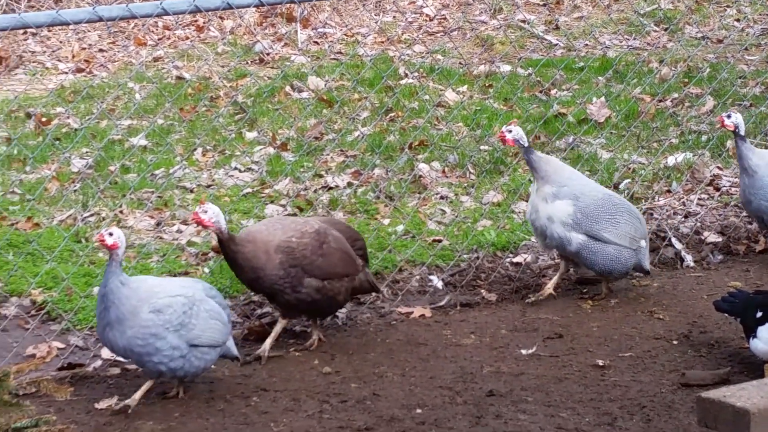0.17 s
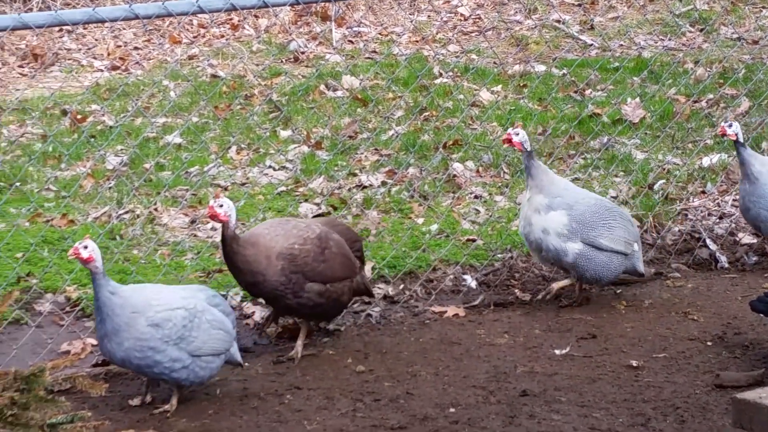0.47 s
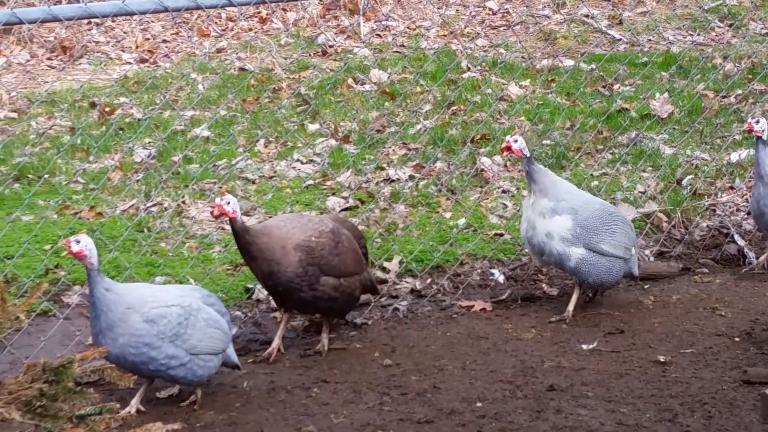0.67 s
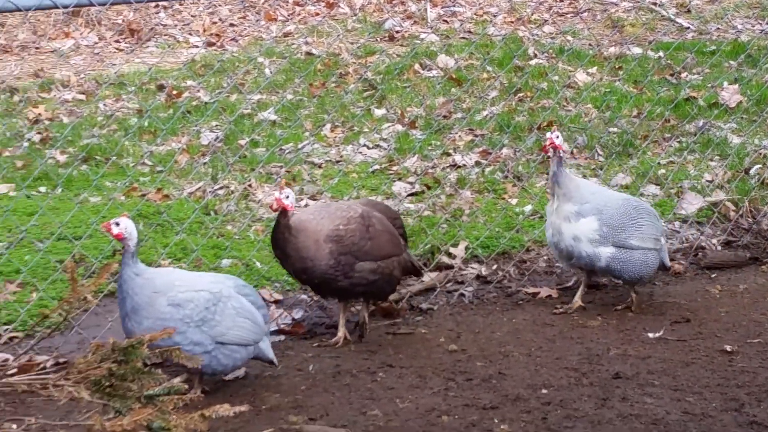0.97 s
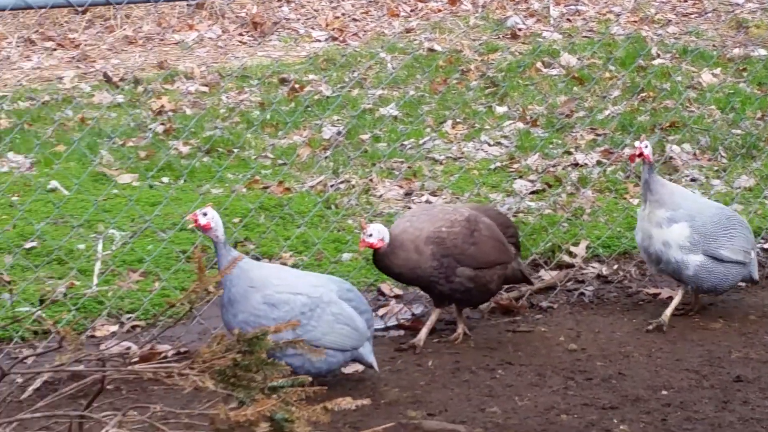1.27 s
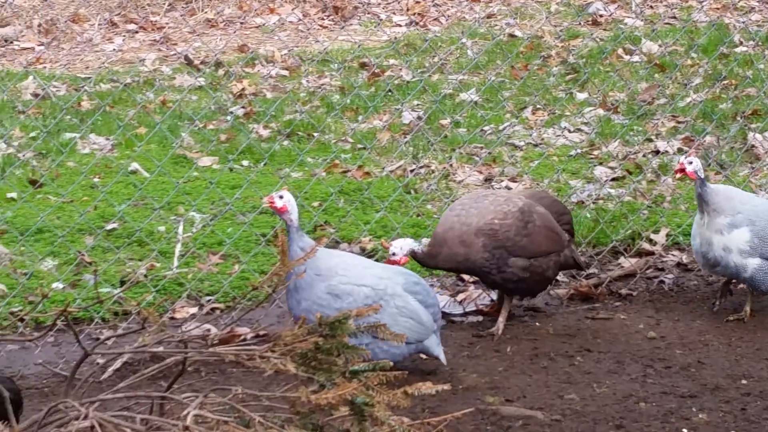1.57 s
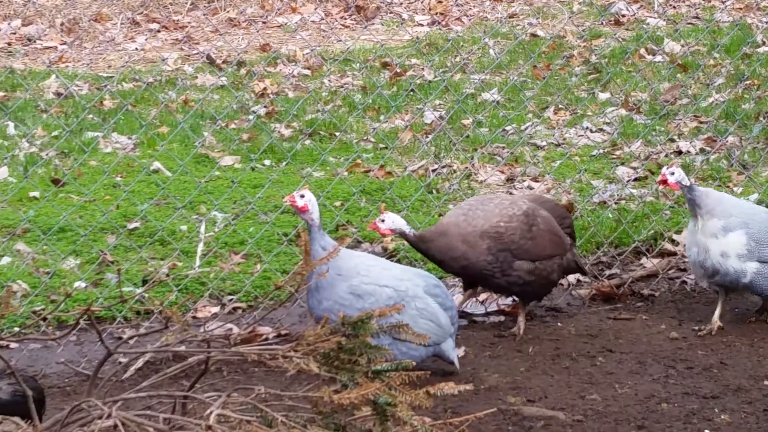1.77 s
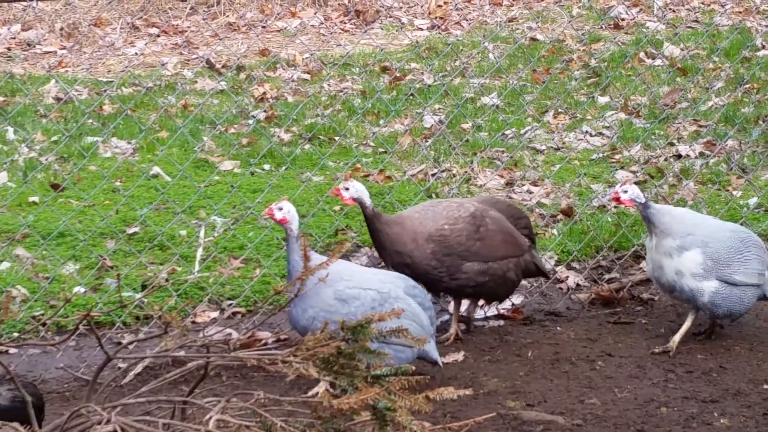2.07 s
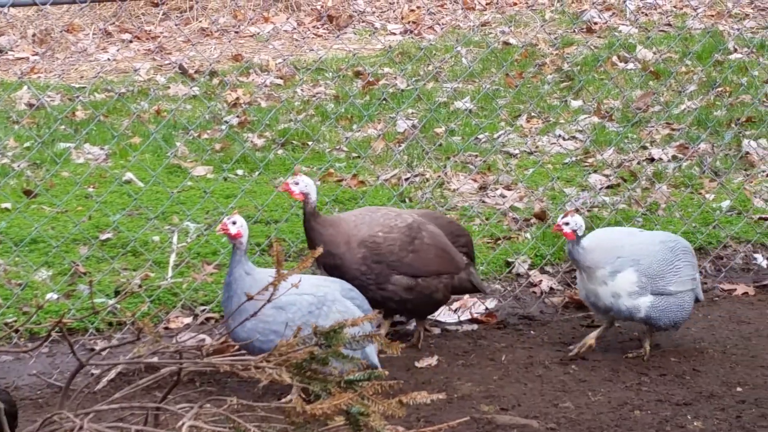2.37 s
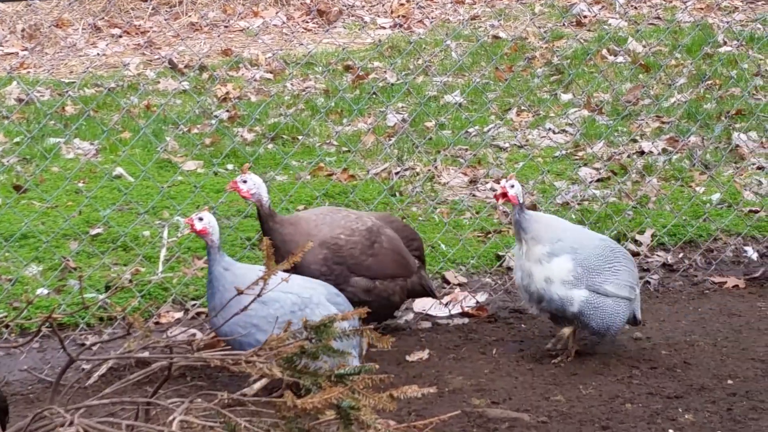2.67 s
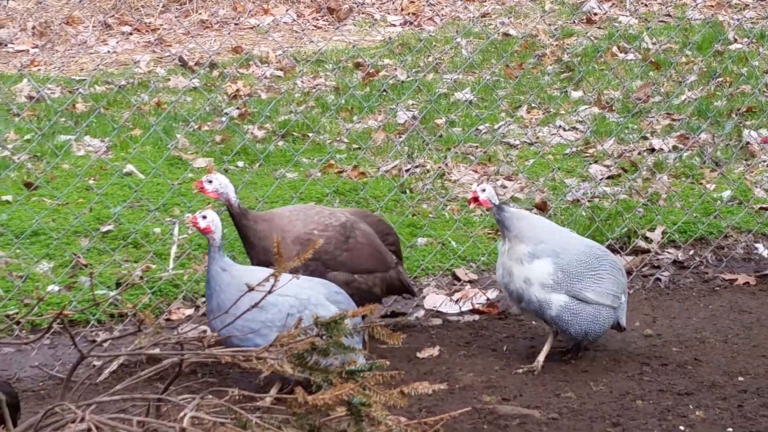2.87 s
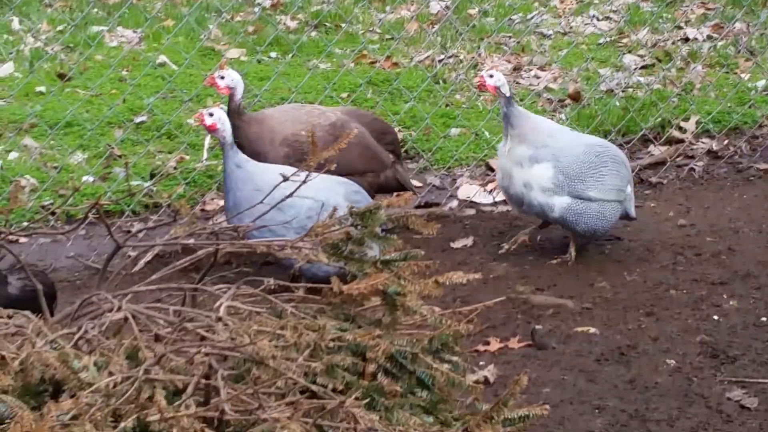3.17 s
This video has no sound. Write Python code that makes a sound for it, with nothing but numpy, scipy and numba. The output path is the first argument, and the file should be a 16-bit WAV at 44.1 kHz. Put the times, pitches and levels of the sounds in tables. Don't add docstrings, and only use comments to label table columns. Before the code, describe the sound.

A guinea fowl flock calls without pause for about 3.3 seconds. Harsh throbbing rattles and deep nasal calls open, with a clear honk near 0.4 s. Squawks, cheks and rattles crowd together from 0.6 to 2.2 s. From 2.3 s the nearest bird chatters, low, bright and loud, ending with a sinking call near 3.2 s. Soft wall echo, gusty wind and far traffic lie beneath; phone stereo.

```python
import sys
import numpy as np
from scipy import signal
from scipy.fft import rfft, irfft
from scipy.io import wavfile
from scipy.ndimage import uniform_filter1d
from numba import njit

SR = 44100
rng = np.random.default_rng(int(sys.argv[2]) if len(sys.argv) > 2 else 0)


def persist_wave(psi):
    counts = np.round(np.clip(psi, -1, 1) * 32767).astype(np.int16)
    wavfile.write(sys.argv[1], SR, np.atleast_2d(counts).T)


def linear_from_db(decibels):
    return 10 ** (np.asarray(decibels, float) / 20)


N = 145971
BINS_HZ = np.arange(1025) * SR / 2048


def level(x, db):
    return x * linear_from_db(db) / np.sqrt(np.mean(x ** 2))


def curve(table, hz):
    points = np.array(table, float)
    return np.interp(np.log(np.maximum(hz, 1)), np.log(points[:, 0]), points[:, 1])


def causal(x, db):
    cepstrum = irfft(db * np.log(10) / 20)
    cepstrum[1:1024] *= 2
    cepstrum[1025:] = 0
    response = irfft(np.exp(rfft(cepstrum)))
    return signal.fftconvolve(x, response)[:len(x)]


def walk(rate_hz):
    hold = max(int(SR / rate_hz), 1)
    steps = np.repeat(rng.standard_normal(N // hold + 1), hold)[:N + hold]
    return 1.3 * uniform_filter1d(uniform_filter1d(steps, hold), hold)[:N]


def flutter(rate_hz):
    width = max(int(SR / 16 / rate_hz), 1)
    z = rng.standard_normal((48, N // 16 + 2, 2)) @ np.array([1, 1j])
    z = uniform_filter1d(uniform_filter1d(z, width, axis=1), width, axis=1)
    return z / z.real.std()


# hz [Hz], level_db [dB per Hz]
AIR = [(25, -15), (60, 1.5), (200, 0.5), (500, -7), (900, -16), (2500, -8.5), (6000, -27), (14000, -21.5)]
# start_s (centre) [s], length_s [s], level_db [dB]
GUSTS = [
    (.55, 0.32, 3.5),
    (1.71, .2, 1.5),
    (2.09, 0.23, 5.5),
    (2.79, 0.25, 0),
]


def breeze():
    out = 0
    swing_db = 1.5
    swell = walk(1.7)
    f = np.fft.rfftfreq(N, 1 / SR) + 1
    seconds = np.arange(N) / SR
    gust_db = sum(db * np.exp(-((seconds - s) / length) ** 2) for s, length, db in GUSTS)
    for hz in 25 * 2 ** np.arange(0, 9.6, .5):
        band = linear_from_db(curve(AIR, f)) * np.exp(-(np.log2(f / hz) / 0.35) ** 2)
        mid, side = irfft(rfft(rng.standard_normal((2, N))) * band, N)
        ports = mid + np.clip(hz / 1160, .2, 1) * side * np.array([[1], [-1]])
        out = out + linear_from_db(gust_db * (hz < 1000) + swing_db * (swell + walk(7.9))) * ports
    return level(out, -37.5)


def peak(f, centre_hz, width_hz):
    return 1 / (1 + (2 * (f - centre_hz) / width_hz) ** 2)


def voice(calls, throb_hz, throb_db, rough, arch, attack_s, beak_db, width_hz, edge_hz, top_db, puff_db,
          root_db=-40, spread_s=0.016, nasal_db=-40, crest=0.2973, fall=1.2, odd_db=0, sweep=0, rasp_s=0):
    ring_s = 0.013
    steady, warble = .65, .003
    swell_db, puff_sag_db = 4.5 - 1, 4.5
    nasal_hz, nasal_width_hz = 5515, 700
    sweep_hz, snap_db = 1000, 14
    rasp_hz, rasp_width_hz, rasp_db, rasp_scatter = 10920, 780, 2, .16

    out = np.zeros(N)
    wobble, drift, air = walk(300), walk(25), rng.standard_normal(N)
    quick, slow = flutter(330), flutter(22).real
    late = rng.uniform(0, 1, (48, 1))
    f = BINS_HZ + 1

    for n, (s, length, db, hz, beak_hz) in enumerate(calls):
        i = int(s * SR) + np.arange(int((length + 5 * ring_s) * SR))
        i = i[(i >= 0) & (i < N)]
        t = i / SR - s
        rise = np.clip(t / length, 0, 1.3)

        beat = np.cumsum(throb_hz * (1 + 0.061 * drift[i])) / SR
        bend = np.where(rise < crest, (1 - rise / crest) ** 2, fall * (rise - crest))
        pitch = hz * (1 - arch * bend + 0.00376 * wobble[i] + 0.0065 * drift[i])
        pitch = pitch * (1 - warble * throb_db * np.sin(2 * np.pi * beat))
        phase = np.cumsum(pitch) / SR
        k = np.arange(1, int(15800 / hz))[:, None]
        lag = late[k[:, 0]]

        def colour(freq, beak):
            body = 1 + linear_from_db(beak_db) * peak(freq, beak, width_hz)
            body = body + linear_from_db(nasal_db) * peak(freq, nasal_hz, nasal_width_hz)
            slope = linear_from_db(top_db * np.clip(np.log2(freq / 4000), 0, 2))
            return body / np.sqrt(1 + (edge_hz / freq) ** 12) * slope

        opening = beat / 2 % 1
        gain = colour(k * hz, beak_hz + sweep * sweep_hz * (opening - .5))
        gain = gain * linear_from_db(odd_db * (k % 2)) + linear_from_db(root_db) * (k == 1)
        snap = linear_from_db(-sweep * snap_db * opening ** 4)

        loose = np.where(k > 1, 1, .1) * (1 - steady / (1 + ((k * hz - beak_hz) / hz) ** 4 * 4))
        share = np.clip(rough * loose * (1 + k * hz / 9000), 0, 1)
        rows = np.ix_(k[:, 0], i // 16)
        throb = linear_from_db(throb_db * np.cos(2 * np.pi * (beat + 0.58 * lag)) + swell_db * slow[rows] * loose)
        wait_s = spread_s * np.abs(np.log2(k * hz / beak_hz)) * (k > 1)
        start = np.clip((t - wait_s) / attack_s, 0, 1)
        unsteady = np.sqrt(1 - share) + np.sqrt(share / 2) * quick[rows]
        tones = unsteady * np.exp(2j * np.pi * (k * phase + 0.23 * lag))
        tones = (gain * throb * start * tones.real).sum(0)

        puffs = air[i] * np.exp(-(phase % 1) / 0.18) * linear_from_db(throb_db * np.cos(2 * np.pi * beat))
        whistle_hz = rasp_hz * (1 + rasp_scatter * (late[-1 - n, 0] - .3))
        hiss = 1 + linear_from_db(rasp_db) * peak(f, whistle_hz, rasp_width_hz)
        hiss = colour(f, beak_hz) * hiss / np.sqrt(1 + (5000 / f) ** 4)
        puffs = level(causal(puffs, 20 * np.log10(hiss + 0.00029)), puff_db)
        if rasp_s:
            rasp = t / rasp_s * np.exp(1 - t / rasp_s)
        else:
            rasp = linear_from_db(-puff_sag_db * rise)

        call = level(tones, 0) + puffs * start[len(k) // 2] * rasp
        out[i] += linear_from_db(db) * call * snap * np.exp(-np.clip(t - length + ring_s, 0, 1) / ring_s * 2)
    return out


# start_s [s], length_s [s], level_db [dB], pitch_hz [Hz], beak_hz (resonance) [Hz]
DEEP = [(-.02, 0.44, -27.5, 372, 1830), (.2, 0.22, -27.5, 442.6, 2400), (.69, .23, -24.5, 370.8, 2570),
        (1.02, 0.52, -23, 369.3, 1530), (1.575, 0.086, -22, 370.8, 1890), (1.8, 0.072, -27, 351, 1410),
        (1.985, .15, -30, 334, 2600), (2.17, 0.087, -26, 330, 2600)]
MURMUR = [
    (1.9, .4, -38, 335, 1340),
]
ARCH = [
    (2.39, .4, -25, 399, 2020),
]


def deep_bird():
    calls = voice(DEEP, throb_hz=69.47, throb_db=4, rough=.55, arch=.02, attack_s=0.008, beak_db=7.4,
                  width_hz=1230, edge_hz=1220, top_db=-4.5, puff_db=-10, root_db=0.5, spread_s=0.0028,
                  nasal_db=4.5)
    arched = voice(ARCH, throb_hz=69.3, throb_db=2.5, rough=0.36, arch=.075, attack_s=0.0054, beak_db=3.6,
                   width_hz=270, edge_hz=1160, top_db=-10, puff_db=-24, root_db=-3, crest=0.45, fall=2.6)
    murmur = voice(MURMUR, throb_hz=70.6, throb_db=2.6, rough=0.62, arch=.03, attack_s=0.026, beak_db=0,
                   width_hz=500, edge_hz=990, top_db=-9, puff_db=-30, root_db=11)
    return calls + arched + murmur


SLOW = [(-.02, 0.096, -25, 580, 4580), (.065, 0.086, -21.5, 600, 4030), (.13, .11, -22, 609, 3350),
        (.235, 0.2, -30, 768, 4630), (.34, 0.089, -25, 771, 5030), (1.27, 0.241, -26.5, 762.4, 5600),
        (1.98, .14, -26.5, 622, 2760), (2.17, 0.099, -27.5, 630, 2890)]


def slow_bird():
    return voice(SLOW, throb_hz=63.35, throb_db=6.5, rough=.28, arch=0.0262, attack_s=0.012, beak_db=15.2,
                 width_hz=386, edge_hz=1150, top_db=-7.5, puff_db=-1)


@njit
def walls(x, lags, gain, damp):
    line, soft, out = np.zeros((8, 8192)), np.zeros(8), np.zeros((2, len(x)))
    for i in range(len(x)):
        total = 0.
        for k in range(8):
            soft[k] += (1 - damp) * (gain[k] * line[k, (i - lags[k]) & 8191] - soft[k])
            total += soft[k]
            out[k % 2, i] += soft[k]
        for k in range(8):
            line[k, i & 8191] = x[i] + soft[k] - total / 4
    return out


def echo(x):
    t60_s = 0.27
    lags = rng.integers(700, 2800, 8)
    return linear_from_db(-14) * walls(x, lags, linear_from_db(-60 * lags / SR / t60_s), .2)


HONKS = [(.135, 0.067, -32, 549, 1100), (.41, 0.054, -18.5, 541, 1590), (.6, 0.13, -37, 546, 1870),
         (.77, 0.048, -25, 516, 1520), (.8, 0.057, -34, 547, 1070), (.973, 0.031, -30.5, 545, 1640),
         (.998, 0.029, -27, 551, 1680), (1.99, 0.061, -32.5, 505, 1500), (2.02, 0.072, -35.5, 545, 1090),
         (2.895, 0.064, -25.5, 535, 1590), (1.796, 0.02, -28.5, 540, 1680), (.64, 0.05, -36, 572, 1680),
         (.845, 0.03, -27.5, 555, 1635), (1.205, .03, -29, 670, 2010), (1.412, 0.026, -25, 664, 1980),
         (1.495, .03, -31, 621, 1860), (1.86, .03, -52, 6100, 6100), (1.99, 0.033, -40, 6050, 6050),
         (2.84, 0.089, -38, 590, 1170), (3.155, 0.039, -41, 590, 1180), (3.235, .09, -38, 469.4, 1410)]
SINKING = [
    (2.98, .085, -33.5, 573, 1120),
    (3.0, .065, -21, 556, 2230),
]


def honking_bird():
    honks = voice(HONKS, throb_hz=60, throb_db=1.5, rough=.08, arch=.04, attack_s=.008, beak_db=30,
                  width_hz=70, edge_hz=950, top_db=-6, puff_db=-28)
    sinking = voice(SINKING, throb_hz=60, throb_db=2.5, rough=.2, arch=.03, attack_s=.012, beak_db=30,
                    width_hz=70, edge_hz=950, top_db=-6, puff_db=-28, fall=4.5)
    return honks + sinking


SQUAWKS = [(.568, .125, -23, 649, 4120), (.928, 0.0637, -24, 640, 3100), (.985, 0.057, -20.5, 630, 3200),
           (1.712, 0.057, -33, 670, 2680), (1.755, 0.036, -28, 740, 4200), (1.855, 0.058, -33.5, 620, 2480),
           (1.908, 0.063, -28.5, 640, 2710), (1.957, 0.024, -26, 600, 3480), (1.974, .028, -25, 540, 3240),
           (2.112, .025, -24.5, 520, 3080), (2.136, 0.04, -26.5, 580, 3430),
           (2.32, 0.058, -24.5, 652, 3400), (2.525, .045, -20, 620, 3410), (3.1, 0.034, -22.5, 560, 2840)]
CHEKS = [(.618, 0.057, -23.5, 685, 3900), (.94, 0.056, -26.5, 685, 3950), (1.714, 0.048, -25.5, 686, 4030),
         (1.778, .045, -24.5, 571, 3420), (1.816, 0.043, -25, 662, 3950), (1.916, 0.05, -23.5, 645, 3880),
         (2.015, 0.053, -28, 649, 3850)]
HELD = [
    (2.16, .052, -20, 752, 4350),
]


def chekking_bird():
    cheks = voice(CHEKS, throb_hz=99, throb_db=1.9, rough=.45, arch=.14, attack_s=.005, beak_db=15.4,
                  width_hz=530, edge_hz=2050, top_db=-1, puff_db=-6, spread_s=0.0063, odd_db=-13,
                  rasp_s=0.0088)
    squawks = voice(SQUAWKS, throb_hz=79.5, throb_db=5.5, rough=.7, arch=0.098, attack_s=.014, beak_db=10.3,
                    width_hz=960, edge_hz=2290, top_db=-3.5, puff_db=-6, spread_s=.015)
    held = voice(HELD, throb_hz=87, throb_db=1.7, rough=.45, arch=0.11, attack_s=0.0065, beak_db=14.7,
                 width_hz=590, edge_hz=2300, top_db=-5, puff_db=-7.5, spread_s=0.0068, odd_db=-13, fall=0.081)
    return cheks + squawks + held


TRILL = [
    (.675, .24, -22.5, 632.7, 4190),
]
HIGH = [(1.04, 0.24, -25, 654.3, 3300), (1.14, .12, -23, 641.4, 3840), (1.4, 0.13, -22, 641, 3900),
        (1.566, 0.08, -22, 633.5, 3750), (2.555, 0.077, -23.5, 647, 4530), (2.64, .19, -23.5, 661.6, 3980),
        (2.83, 0.11, -25, 641, 3900), (2.96, 0.1, -27.5, 652, 3430)]


def high_bird():
    rattles = voice(HIGH, throb_hz=77.7, throb_db=5, rough=.5, arch=0.039, attack_s=0.0067, beak_db=11.2,
                    width_hz=1350, edge_hz=1780, top_db=-6.5, puff_db=-4.5)
    trill = voice(TRILL, throb_hz=78, throb_db=2.5, rough=.4, arch=.02, attack_s=0.0045, beak_db=19,
                  width_hz=540, edge_hz=1900, top_db=-1.5, puff_db=-1, sweep=1)
    return rattles + trill


NEAR = [(2.332, 0.078, -16, 365.8, 2300), (2.465, 0.063, -15.5, 379.3, 2420),
        (2.595, 0.057, -20, 357.7, 2280), (2.7, 0.059, -20.5, 361.8, 2300),
        (2.803, 0.049, -17.5, 356.3, 2240), (2.912, 0.056, -17.5, 358.3, 2200),
        (3.045, 0.057, -17, 362, 2410)]
LAST = [
    (3.186, .15, -18.5, 353.6, 2220),
]


def nearest_bird():
    chatter = voice(NEAR, throb_hz=79, throb_db=0.5, rough=.55, arch=.04, attack_s=0.0036, beak_db=16.2,
                    width_hz=550, edge_hz=1190, top_db=-1.8, puff_db=-1.2, root_db=3.5, spread_s=0.002,
                    nasal_db=5, rasp_s=0.013)
    last = voice(LAST, throb_hz=75.3, throb_db=0.98, rough=0.39, arch=-.08, attack_s=0.0054, beak_db=20,
                 width_hz=410, edge_hz=1200, top_db=-2.2, puff_db=-1.5, root_db=5, spread_s=0.00067,
                 nasal_db=5.5, crest=0.49, fall=0.505)
    return chatter + last


def placed(x, lag_ms, left_treble_db):
    f = np.fft.rfftfreq(N, 1 / SR)
    shade = linear_from_db(left_treble_db * np.clip((f - 6000) / 3000, 0, 1))
    left = irfft(rfft(x) * shade * np.exp(-2j * np.pi * f * lag_ms / 1000), N)
    return np.array([left, x])


def scene():
    air = breeze()
    honks = honking_bird()
    flock = placed(deep_bird(), 0.209, 1.5)
    flock = flock + placed(slow_bird(), 0.0049, 3.3)
    flock = flock + placed(honks, 0.15, 2.1)
    flock = flock + placed(chekking_bird(), 0.083, 2.9)
    flock = flock + placed(high_bird(), 0.13, 1.9)
    flock = flock + placed(nearest_bird(), 0.3, -1.6)
    return flock + echo(flock[1] - honks / 2) + air


def low_pass(x):
    return signal.sosfilt(signal.butter(12, 15970, fs=SR, output="sos"), x)


# hz [Hz], level_db [dB]
LEFT_PORT = [(400, -0.5), (1800, 4), (4600, 8.5), (5800, 1.5), (7000, -9.5), (8800, -1.5), (12000, -5.5),
             (15500, -7)]
# hz [Hz], level_db [dB]
RIGHT_PORT = [(400, 0), (2200, 0), (4000, -5), (6200, -24), (8500, -22), (9700, 4.5), (11200, 8.5),
              (15500, -4)]


def record(dry):
    left = causal(dry[0], curve(LEFT_PORT, BINS_HZ))
    right = causal(dry[1], curve(RIGHT_PORT, BINS_HZ))
    x = np.array([left, right])
    x = x + linear_from_db(-52) * rng.standard_normal(x.shape)
    x = np.tanh(.8 * x) / .8
    mix = signal.sosfilt(signal.ellip(8, .2, 70, 15900, fs=SR, output="sos"), x)
    return low_pass(mix)


dry = scene()
out = record(dry)
persist_wave(out)
```